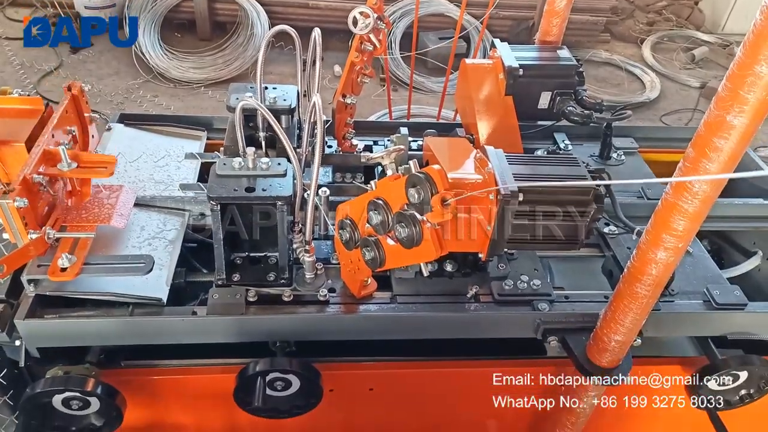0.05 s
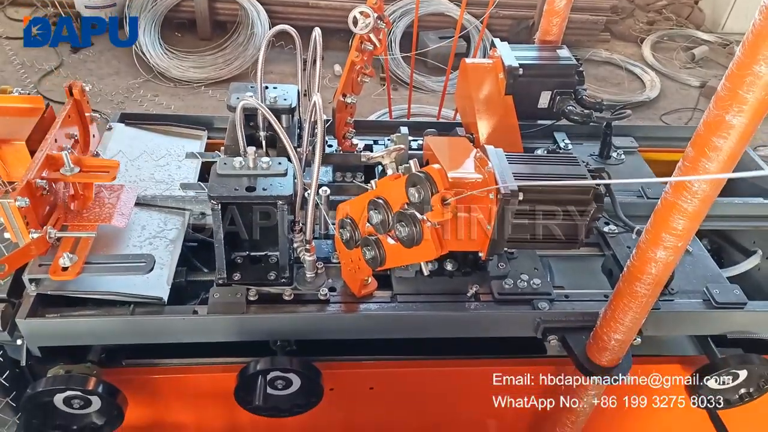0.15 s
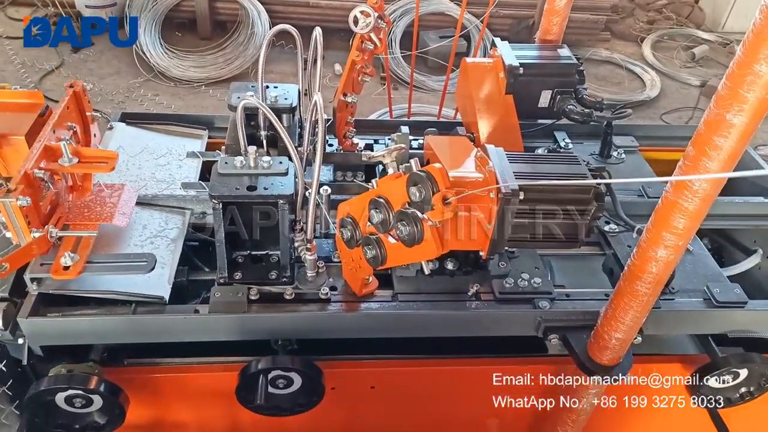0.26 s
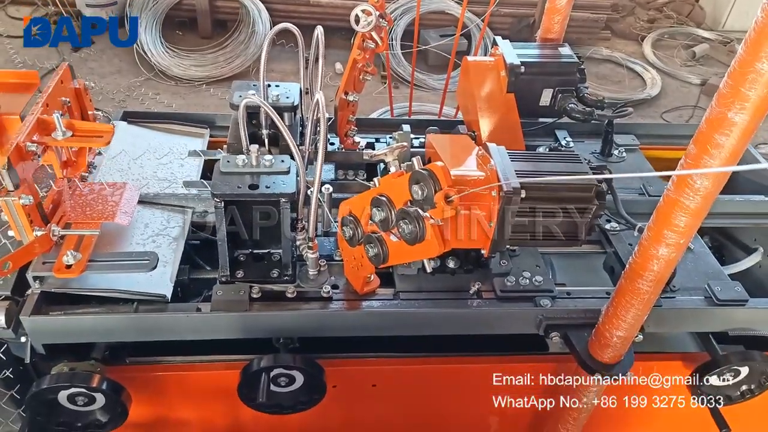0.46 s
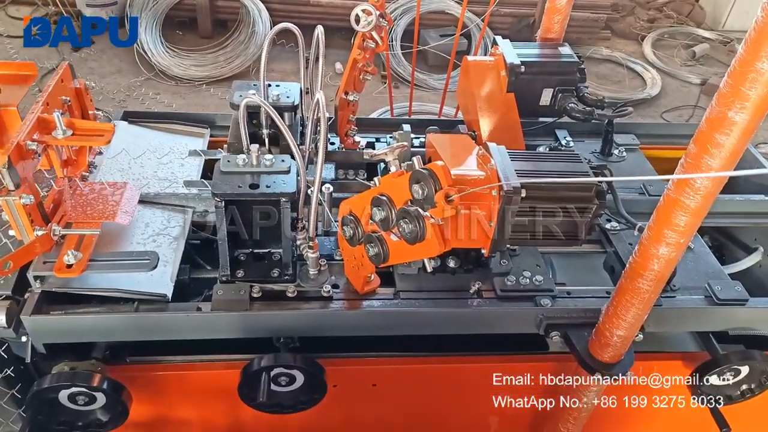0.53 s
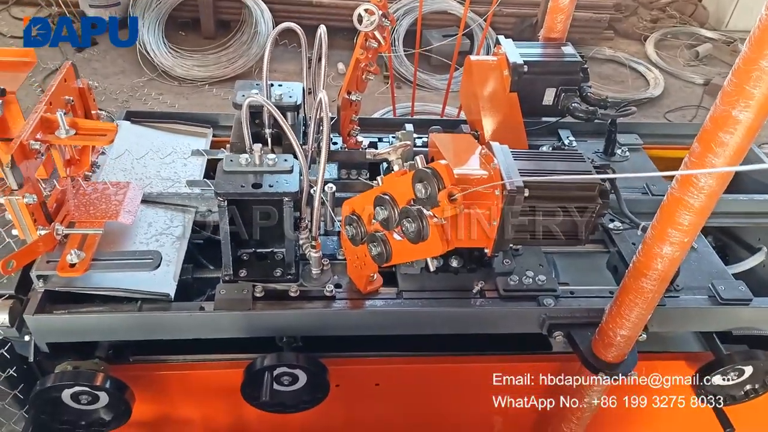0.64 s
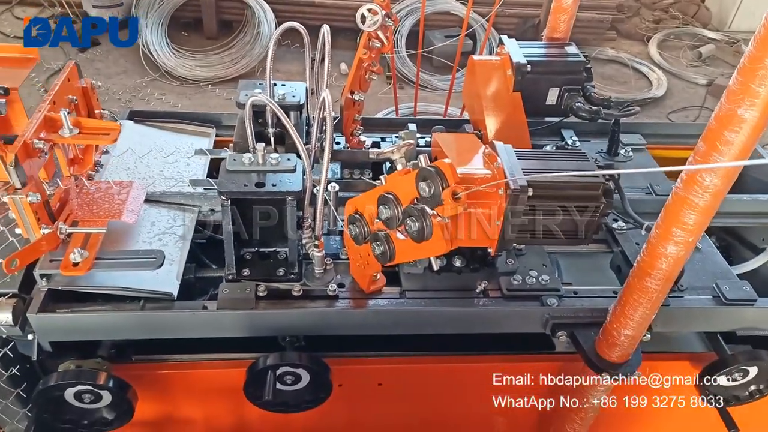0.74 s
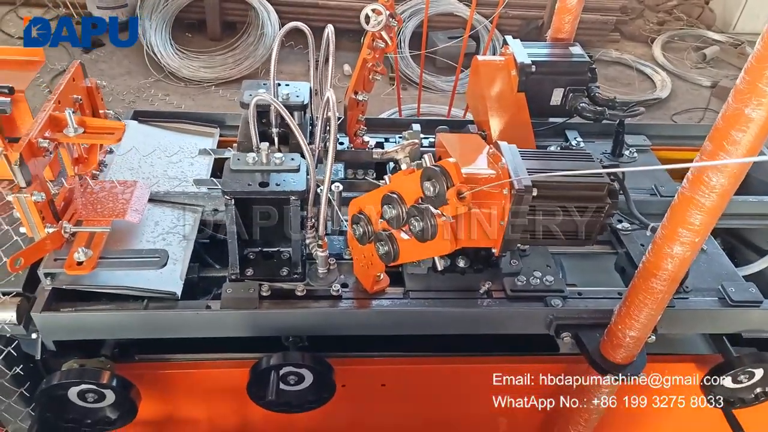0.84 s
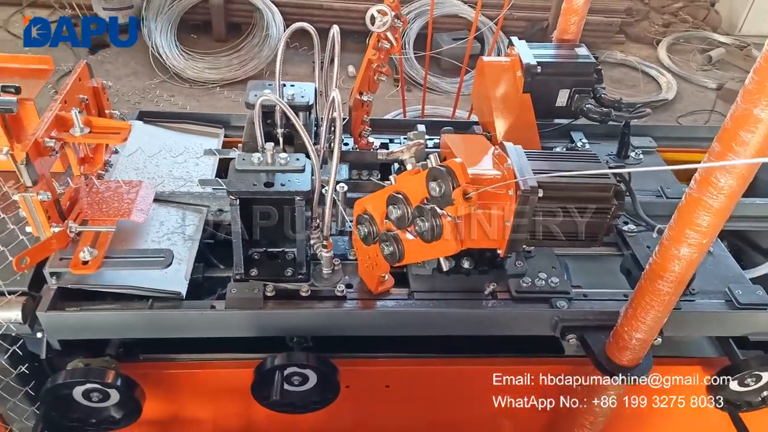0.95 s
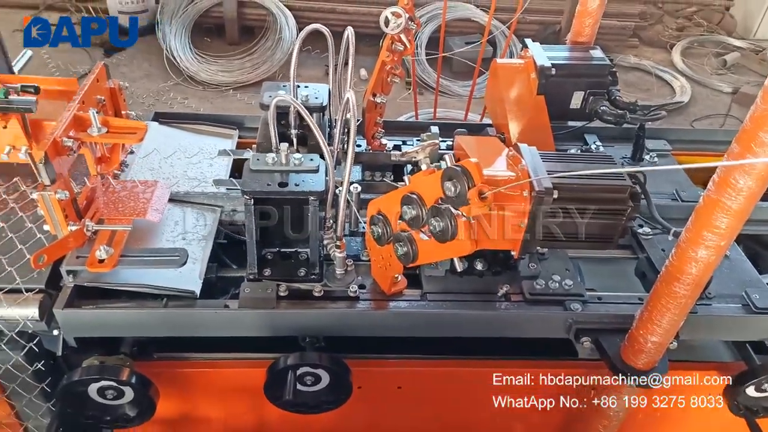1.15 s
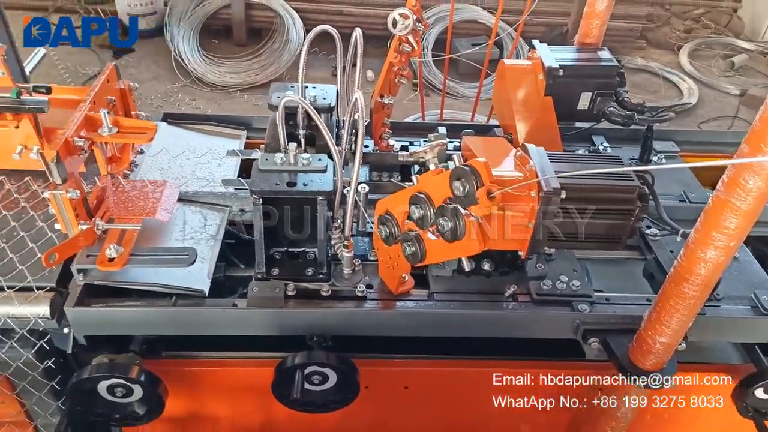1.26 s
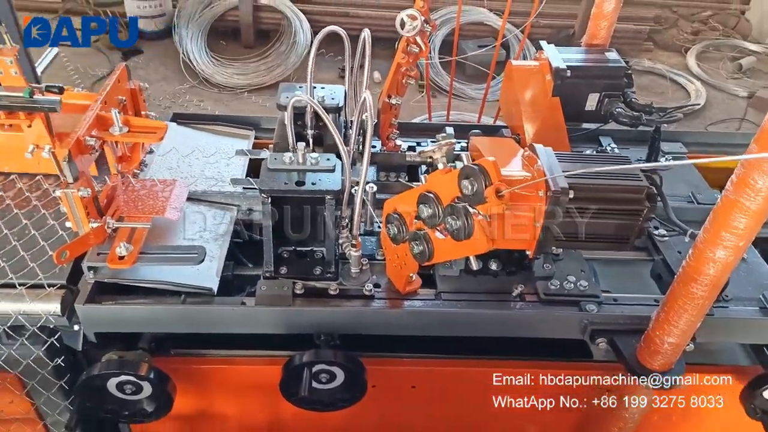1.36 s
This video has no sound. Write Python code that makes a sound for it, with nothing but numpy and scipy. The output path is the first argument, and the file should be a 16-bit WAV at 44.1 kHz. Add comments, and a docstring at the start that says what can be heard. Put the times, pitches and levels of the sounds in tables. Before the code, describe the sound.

A wire mesh weaving machine hums close by in a reverberant workshop, with a faint high whistle just before 0.2 seconds. Steel parts then clash loudly at about 0.25, 0.4, 0.5 and 0.7 seconds, some ringing on, amid carriage clunks, scraping wire and ticking latches. Lighter knocks follow around 0.9 seconds, and the ringing fades into a low motor whirr and electrical hum.

```python
"""A wire mesh weaving machine runs one stroke: steel parts clash loudly four times among lighter knocks,
some ringing on. Each blow is a burst of contacts that shakes the frame, the panels and a steel part.
The drive whistles, the carriage rumbles and clunks, wire scrapes through its guides, latches tick.
The workshop reverberates over mains hum and motor whirr; two microphone ports hear it close by."""
import sys
import numpy as np
from scipy import signal
from scipy.fft import rfft, irfft
from scipy.io import wavfile

SR = 44100
rng = np.random.default_rng(int(sys.argv[2]) if len(sys.argv) > 2 else 0)


def output_pcm(signal):
    """Save a mono or channel-first signal as 16-bit PCM at the path in sys.argv[1].

    Samples are clipped to [-1, 1] before scaling.
    """
    pcm = np.clip(np.atleast_2d(signal).T, -1, 1) * 32767
    wavfile.write(sys.argv[1], SR, np.round(pcm).astype(np.int16))


N = 61739

# Motor and fan noise. Each row: frequency in Hz, relative density in dB.
WHIRR_SPECTRUM_DB = [(15, -22), (45, 0), (110, 2.5), (280, -4.5), (450, -12.5), (760, -19), (1100, -14.5),
                     (1500, -12), (2100, -8.5), (3200, -13.5), (4200, -16.5), (5200, -28), (7200, -34),
                     (8000, -26), (9500, -50), (11400, -42), (12100, -37), (12900, -53), (16000, -49)]
# Mains hum and whines. Each row: frequency in Hz, level in dB.
HUM_LINES = [(51.2, -38), (103, -40), (1030, -53.5), (1157, -54.5), (1906, -52), (7903, -64)]
# Workshop reverberation. Each row: frequency in Hz, T60 in seconds.
HALL_T60_S = [(60, 1.1), (250, 1.5), (750, 0.89), (1200, 2.4), (2300, 2.12), (4500, 1.36), (8000, 0.71),
              (16000, 0.6)]
# Diffuse sound at the ports. Each row: frequency in Hz, left-right coherence from 0 to 1.
PORT_COHERENCE = [(30, .995), (300, 0.97), (520, 0.78), (1200, 0.053), (3000, 0.045), (16000, .03)]
# Microphone port colours. Each row: frequency in Hz, gain in dB.
LEFT_PORT_DB = [(100, -4), (700, 3.5), (1250, 2), (2000, -4.5), (4000, 2.5), (7300, -1.5), (8500, 5.5),
                (9600, 1), (12000, 1), (16000, -2.5)]
RIGHT_PORT_DB = [(100, -4.5), (700, 3), (1900, 3), (4000, 2.5), (6800, 2.5), (7600, -5.5), (8400, -23),
                 (9200, -14), (12000, -4.5), (16000, 2.5)]
# The machine's body shades the treble and scatters it. Each row: frequency in Hz, gain in dB.
DIRECT_PATH_DB = [(450, -1), (1000, -2), (4000, 0), (10000, -8.5)]
SCATTERED_PATH_DB = [(150, -14.5), (450, -5), (1000, -2), (4000, -1), (10000, 1)]
# Carriage travel and wire feed. Each row: time in seconds, level in dB.
CARRIAGE_ENVELOPE_DB = [(0, -74), (.2, -34.5), (.26, -24.5), (.35, -30.5), (.41, -30.5), (.48, -21.5),
                        (.6, -37.5), (.8, -44.5), (1.05, -46.5), (1.4, -54)]
WIRE_ENVELOPE_DB = [(0, -46), (.17, -51.5), (.21, -31), (.24, -22.5), (.33, -25.5), (.36, -25.5),
                    (.435, -22.5), (.47, -30.5), (.53, -29), (.57, -37.5), (.68, -44), (.8, -46),
                    (1.05, -76)]
# What each part radiates. Each row: frequency in Hz, relative density in dB.
CARRIAGE_SPECTRUM_DB = [(30, -26), (110, -6.5), (155, 0), (260, -11), (480, -8), (850, -20), (3000, -44)]
WIRE_SPECTRUM_DB = [(200, -18), (900, -9.5), (2400, 0), (4200, -5), (5700, -7.5), (8000, -7.5),
                    (11000, -13.5), (16000, -23.5)]
FRAME_SPECTRUM_DB = [(30, -15), (70, -12), (125, -7.5), (200, 1.5), (280, -0.5), (400, -12.5), (900, -48.5)]
PANEL_SPECTRUM_DB = [(150, -14), (300, -11), (480, -2.5), (750, 2), (1120, -2), (1400, -3.5), (6000, -56)]
STEEL_SPECTRUM_DB = [(600, -33.5), (1250, -8.5), (1700, -5), (2350, 1), (3000, -2.5), (4100, -3.5),
                     (4900, -7.5), (5650, -10), (7000, -12.5), (10000, -22), (16000, -30.5)]
EDGE_SPECTRUM_DB = [(2000, -19), (4000, 1.5), (5600, -2.5), (7000, -3.5), (8600, 0.5), (11000, -7.5),
                    (16000, -13)]
# Heavy carriage stops. Each row: start in seconds, frequency in Hz, level in dB, decay in seconds.
CARRIAGE_STOPS = [(0.211, 41.4, -27, 0.03), (0.337, 92.5, -24, 0.0087), (0.698, 100, -23.5, 0.01)]
# Latches and stops snapping shut. Each row: start in seconds, level in dB, pitch in Hz.
LATCH_TICKS = [(.325, -17, 4200), (0.515, -11, 3830), (.59, -17, 8700), (.706, -10, 5000),
               (0.842, -25, 6660), (0.924, -28, 8400)]
# Machine resonances. Each row: frequency in Hz, relative level in dB, T60 in seconds.
MACHINE_MODES = [(155.5, -3, 0.23), (286.5, -8.5, 0.18), (473.6, -11.5, 0.31), (882, -14, .3),
                 (1060, -7, .35), (1300, -11, 0.22), (1945, 0.5, 0.13), (2320, -3.5, 0.21), (2430, 3, 0.21),
                 (3268, -8, 0.36), (3800, -7, 0.28), (5540, 3, 0.13)]
# Hard-knocked parts. Each row: start in seconds, lower mode in Hz, level in dB, T60 in seconds.
SINGING_PARTS = [(0.235, 202, -14, 0.16), (.387, 5590, -18, 0.1), (0.496, 2356, -20, .33),
                 (0.707, 2000, -29, 0.29), (0.709, 1270, -26, 0.52)]
# Blows of the stroke. Each row: start, rise and chatter decay in seconds; frame thud, panel clank,
# steel clash and bright edge levels in dB; pitch of the struck part in Hz.
STROKE_BLOWS = [(.211, .004, 0.03, -34, -26, -34, -35, 1880),
                (.228, 0.0092, 0.018, -17, -14, -15, -25, 2410),
                (0.251, 0.0036, 0.013, -15, -17, -14.5, -38, 2520),
                (0.274, 0.0023, 0.011, -22, -24.5, -27, -47, 1700),
                (0.361, 0.0056, 0.026, -33.5, -33, -28.5, -22.5, 3900),
                (.384, 0.0043, 0.019, -38, -33.5, -13.5, -17, 2490),
                (.445, 0.024, 0.036, -22.5, -25, -29.5, -34.5, 2350),
                (0.488, 0.0023, 0.018, -27.5, -31.5, -12.5, -32, 3710),
                (.587, 0.0026, 0.01, -44, -30.5, -30, -26, 2400),
                (0.693, 0.0065, 0.022, -32.5, -30, -21.5, -44, 1966),
                (0.7046, 0.0022, 0.015, -27, -25.5, -12, -39, 1990),
                (0.741, 0.0014, 0.031, -40, -30, -26.5, -50, 1900),
                (0.903, 0.007, 0.013, -45, -40, -24.5, -34.5, 2525),
                (.922, 0.0065, 0.008, -47, -34.5, -25.5, -46, 2520)]

EVENT_LENGTH_S = 0.25


def amp(db):
    """Decibels to gain."""
    return 10 ** (np.asarray(db) / 20)


def unit_rms(x):
    """Scales to RMS 1."""
    return x / np.sqrt(np.mean(x ** 2) + 1e-20)


def at_hz(points, hz):
    """Interpolates a table on a log-frequency axis."""
    table_hz, values = np.transpose(points)
    return np.interp(np.log(hz + 1), np.log(table_hz + 1), values)


def envelope(points):
    """Gain over time from (s, dB) points."""
    return amp(np.interp(np.arange(N) / SR, *np.transpose(points)))


def add(mix, start_s, sound):
    """Mixes a sound in at start_s."""
    span = mix[round(start_s * SR):][:len(sound)]
    span += sound[:len(span)]


def colour(x, points, size=4096):
    """Minimum-phase filter from (Hz, dB) points."""
    log_gain = np.log(amp(at_hz(points, abs(np.fft.fftfreq(size, 1 / SR)))))
    response = np.exp(np.conj(signal.hilbert(log_gain)))
    taps = np.fft.ifft(response).real[:size // 2]
    return signal.fftconvolve(x, taps)[:len(x)]


def resonate(x, hz, width_hz):
    """Broad resonance with steep skirts: two passes, each width_hz wide."""
    b, a = signal.iirpeak(hz, hz / width_hz, SR)
    return signal.lfilter(b, a, signal.lfilter(b, a, x))


def diffuse(pair):
    """Makes two unrelated signals alike in the bass, as two close ports hear them."""
    a, b = rfft(pair)
    coherence = np.clip(at_hz(PORT_COHERENCE, np.fft.rfftfreq(N, 1 / SR)), 0, 1)
    return irfft(np.array([a, coherence * a + np.sqrt(1 - coherence ** 2) * b]), N)


def contacts(per_s, spread_db, samples=N):
    """Random metal-on-metal clicks of uneven size."""
    hits = rng.random(samples) < per_s / SR
    signs = rng.choice([-1, 1], samples)
    return hits * signs * amp(spread_db * np.clip(rng.standard_normal(samples), -2, 2))


def motors(whirr_db=-30.5, drift_db_per_s=-1.02, waver=0.46, waver_hz=6):
    """Slowly fading fan whirr; mains hum and faint whines waver in level and phase."""
    t, hz = np.arange(N) / SR, np.fft.rfftfreq(N, 1 / SR)
    whirr = irfft(rfft(rng.standard_normal((2, N))) * amp(at_hz(WHIRR_SPECTRUM_DB, hz)), N)
    out = unit_rms(diffuse(whirr)) * amp(whirr_db + drift_db_per_s * t)
    lowpass = np.exp(-hz / waver_hz)
    for line_hz, db in HUM_LINES:
        swell, sway = (unit_rms(irfft(rfft(rng.standard_normal(N)) * lowpass, N)) for _ in range(2))
        tone = np.sin(2 * np.pi * line_hz * t + waver * sway)
        out += amp(db) * np.sqrt(2) * (1 + waver * swell) * tone
    return out


def reflections(x, t60_points, size=256):
    """Dense echoes, each band dying at the rate set by (Hz, T60 s) points."""
    hz, t, noise = signal.stft(diffuse(rng.standard_normal((2, N))), SR, nperseg=size)
    fade = amp(-60 * t / at_hz(t60_points, hz)[:, None])
    tail = signal.istft(noise * fade, SR, nperseg=size)[1][:, :N]
    return signal.fftconvolve(x[None], tail / np.linalg.norm(tail[0]), axes=1)[:, :N]


def drive_whistle(peak_s=0.17, half_width_s=0.045, hz=8040, db=-46):
    """The drive whistles briefly as it takes up the load."""
    t = np.arange(N) / SR
    return amp(db) * np.exp(-((t - peak_s) / half_width_s) ** 2) * np.sin(2 * np.pi * hz * t)


def carriage_rumble():
    """Dull jolts of the travelling carriage."""
    jolts = contacts(per_s=640, spread_db=8)
    return envelope(CARRIAGE_ENVELOPE_DB) * unit_rms(colour(jolts, CARRIAGE_SPECTRUM_DB))


def carriage_thumps():
    """The bed sways for a few cycles when the carriage stops."""
    out = np.zeros(N)
    for start_s, hz, db, decay_s in CARRIAGE_STOPS:
        t = np.maximum(np.arange(N) / SR - start_s, 0)
        shape = t / decay_s * np.exp(1 - t / decay_s)
        out += amp(db) * np.sqrt(2) * shape * np.sin(2 * np.pi * hz * t)
    return out


def wire_scrape():
    """Fine stick-slip grains of wire in its guides."""
    grains = contacts(per_s=5600, spread_db=2)
    return envelope(WIRE_ENVELOPE_DB) * unit_rms(colour(grains, WIRE_SPECTRUM_DB))


def latch_ticks(decay_s=0.0025):
    """Short, bright snaps of small steel parts."""
    t, out = np.arange(0, EVENT_LENGTH_S, 1 / SR), np.zeros(N)
    shape = np.exp(-t / decay_s)
    for start_s, db, hz in LATCH_TICKS:
        snap = resonate(shape * rng.choice([-1, 1], len(t)), hz, width_hz=2600)
        add(out, start_s, amp(db) * np.sqrt(np.mean(shape ** 2)) * unit_rms(snap))
    return out


def machine_ring(x, gain_db=-10.5):
    """The machine's modes ring on after each contact, differently toward each port."""
    t, modes = np.arange(N) / SR, np.zeros((2, N))
    for hz, db, t60_s in MACHINE_MODES:
        tone = np.sin(2 * np.pi * (hz * t + rng.random((2, 1))))
        modes += amp(db) * unit_rms(amp(-60 * t / t60_s) * tone)
    response = diffuse(modes) / np.sqrt(N * len(MACHINE_MODES))
    return amp(gain_db) * signal.fftconvolve(x[None], response, axes=1)[:, :N]


def singing_parts():
    """A knocked part rings with a close pair of modes that beat as they die."""
    t, out = np.arange(N) / SR, np.zeros(N)
    for start_s, hz, db, t60_s in SINGING_PARTS:
        beat_hz = 27.6 * rng.uniform(0.41, 2.05)
        pair = np.sin(2 * np.pi * hz * t) + 0.5 * np.sin(2 * np.pi * (hz + beat_hz) * t)
        add(out, start_s, amp(db) * amp(-60 * t / t60_s) * pair)
    return out


def blows(part_db=-3):
    """Bursts of chatter shake the frame, the panels and a steel part with its own pitch."""
    t, out = np.arange(0, EVENT_LENGTH_S, 1 / SR), np.zeros(N)
    for start_s, rise_s, decay_s, frame_db, panel_db, steel_db, edge_db, part_hz in STROKE_BLOWS:
        shape = np.minimum(t / rise_s, 1) * np.exp(-np.maximum(t - rise_s, 0) / decay_s)
        frame, panel, steel, edge, part = (
            shape * contacts(per_s=3200, spread_db=3, samples=len(t)) for _ in range(5))
        thud = amp(frame_db) * unit_rms(colour(frame, FRAME_SPECTRUM_DB))
        clank = amp(panel_db) * unit_rms(colour(panel, PANEL_SPECTRUM_DB))
        pitched = amp(part_db) * unit_rms(resonate(part, part_hz, width_hz=850))
        clash = amp(steel_db) * unit_rms(unit_rms(colour(steel, STEEL_SPECTRUM_DB)) + pitched)
        bright = amp(edge_db) * unit_rms(colour(edge, EDGE_SPECTRUM_DB))
        add(out, start_s, np.sqrt(np.mean(shape ** 2)) * (thud + clank + clash + bright))
    return out


def scene(right_lag_s=0.0005, scatter_t60_s=0.1, hall_db=-5):
    """Exposed contacts arrive directly, hidden ones scattered by the body; the hall reflects both."""
    exposed = blows() + latch_ticks() + wire_scrape() + carriage_rumble()
    hidden = blows() + wire_scrape()
    left = colour(exposed, DIRECT_PATH_DB) + carriage_thumps() + singing_parts()
    right = np.pad(left, (round(right_lag_s * SR), 0))[:N]
    scattered = reflections(colour(hidden, SCATTERED_PATH_DB), [(1, scatter_t60_s)])
    hall = (reflections(exposed, HALL_T60_S) + reflections(hidden, HALL_T60_S)) / np.sqrt(2)
    machine = np.array([left, right]) + scattered + machine_ring(exposed) + drive_whistle()
    return machine + amp(hall_db) * hall + motors()


def record(dry, ceiling=0.9, cutoff_hz=15750):
    """Port colours, soft overload, band limit."""
    ports = np.array([colour(dry[0], LEFT_PORT_DB), colour(dry[1], RIGHT_PORT_DB)])
    limited = ports / (1 + (ports / ceiling) ** 8) ** (1 / 8)
    lowpass = signal.firwin(511, cutoff_hz, window=("kaiser", 9), fs=SR)
    return signal.oaconvolve(limited, lowpass[None], "same")


dry = scene()
out = record(dry)
output_pcm(out)
```